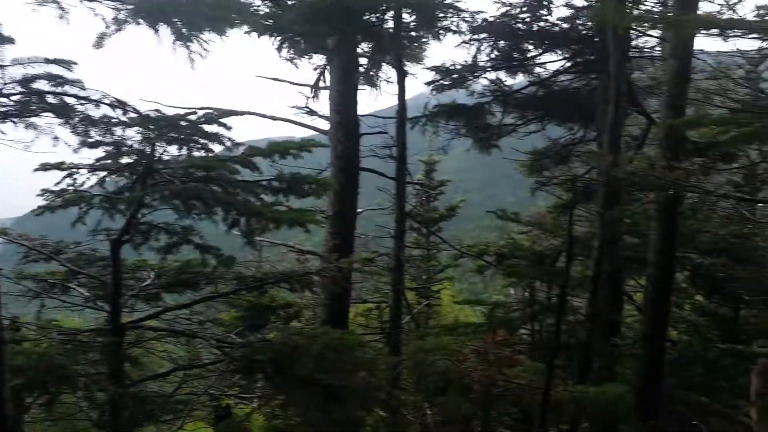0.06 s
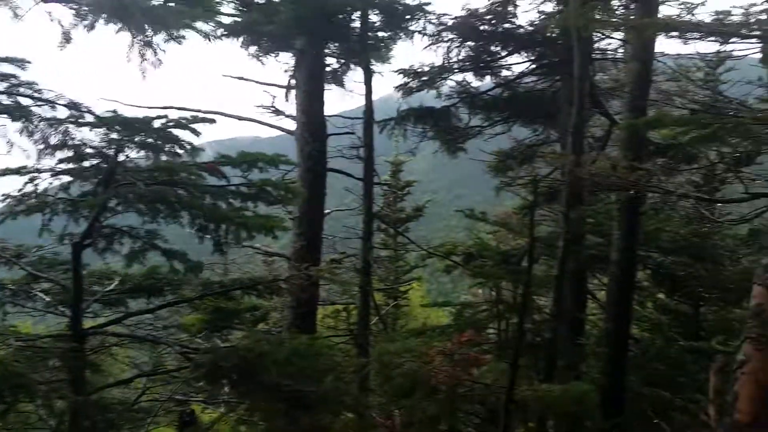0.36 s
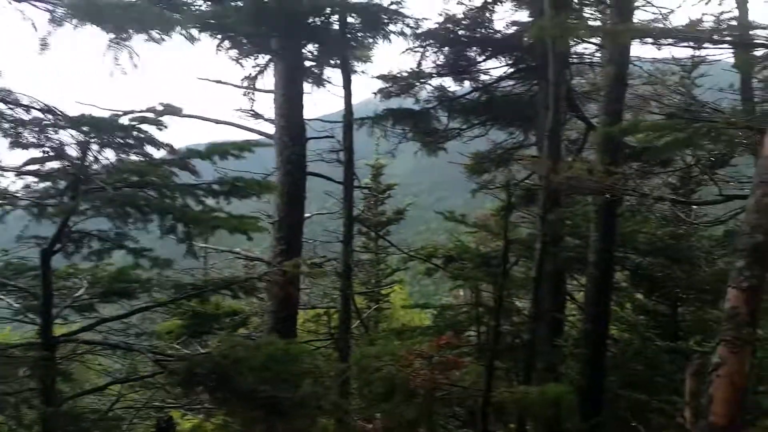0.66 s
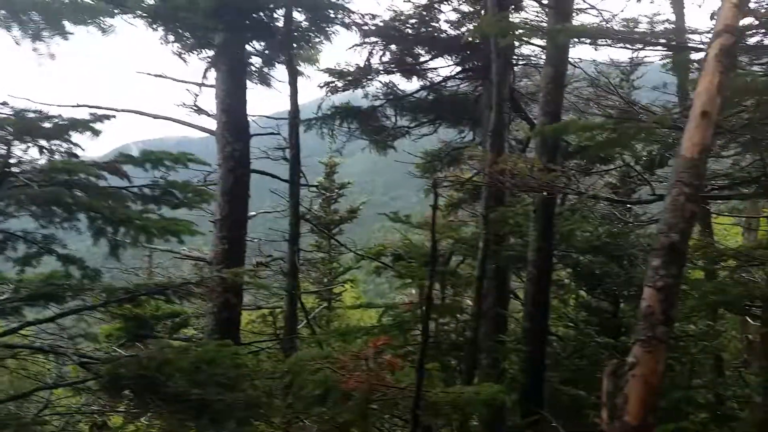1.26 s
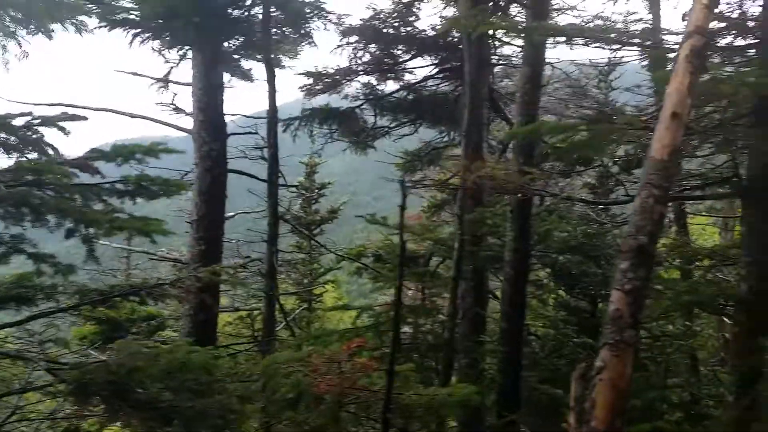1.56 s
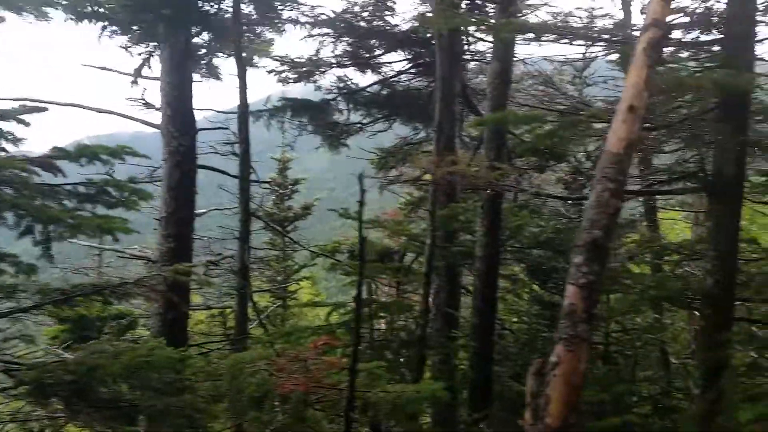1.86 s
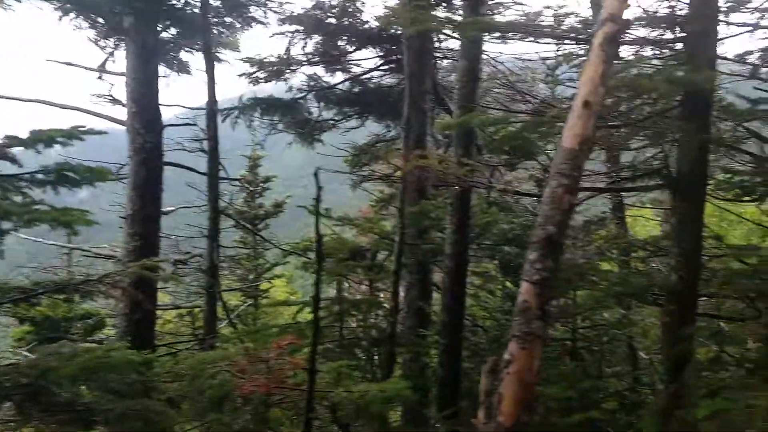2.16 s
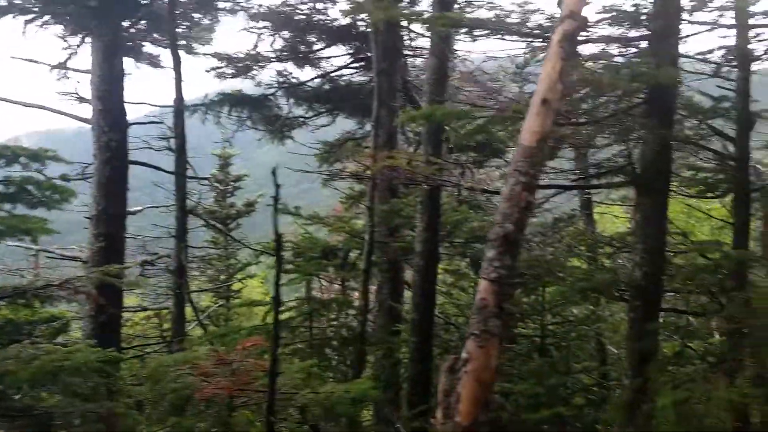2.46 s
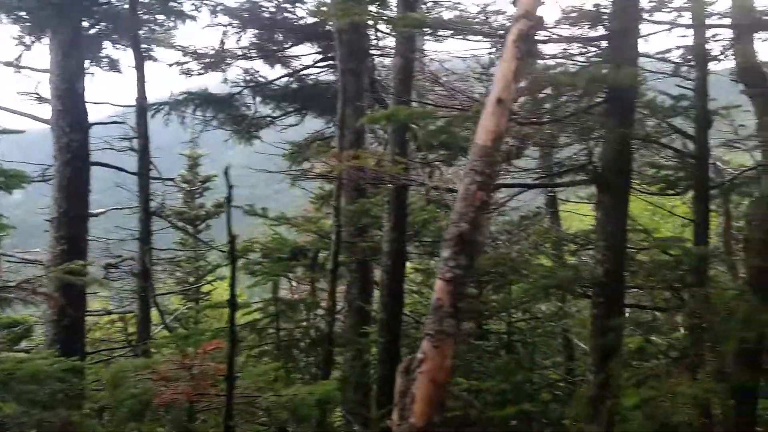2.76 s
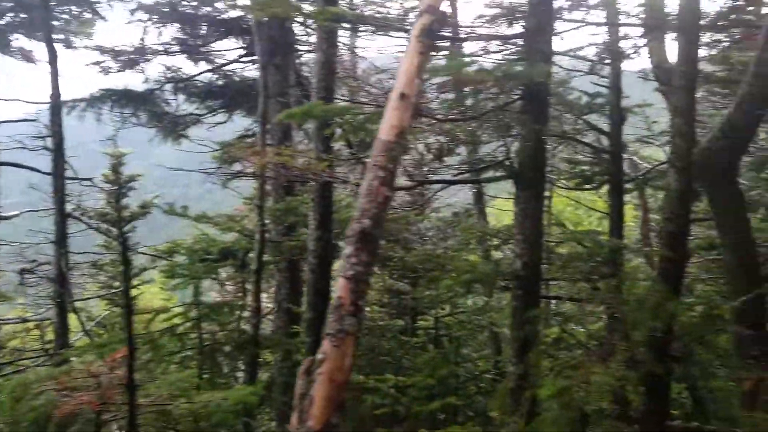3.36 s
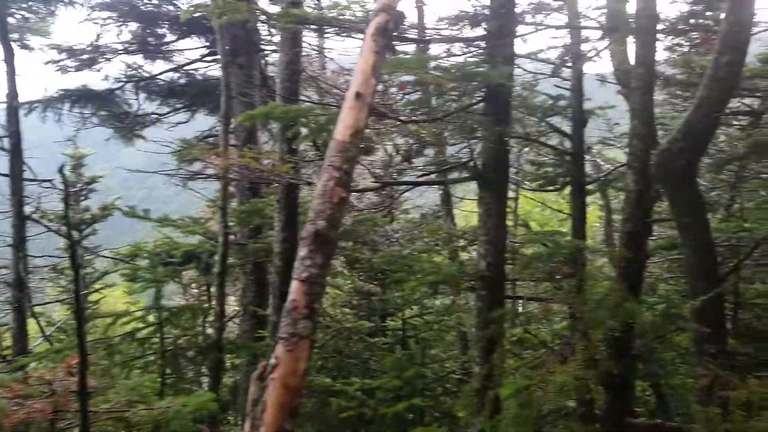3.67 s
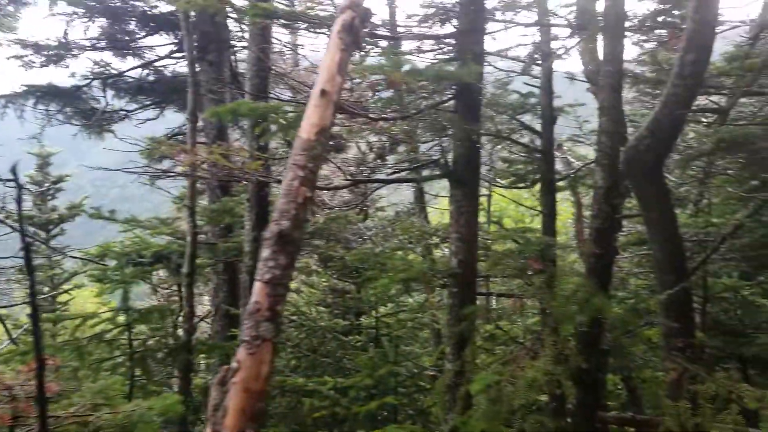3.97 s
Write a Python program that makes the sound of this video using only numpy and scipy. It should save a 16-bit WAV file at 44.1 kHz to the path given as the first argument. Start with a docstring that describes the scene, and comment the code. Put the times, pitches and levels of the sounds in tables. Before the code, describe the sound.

Wind rushes through conifers throughout, with a thin, high hiss in the needles. From the start, irregular puffs buffet the microphone left and right, making a low, fluttering rumble. Very faint dry twig ticks, mostly on the right, thicken to a light patter around 2 seconds. The hardest puff hits near 2.7 seconds. Buffeting continues until 4 seconds while the rush in the trees eases and dulls slightly.

```python
"""From the start, turbulent wind roars through conifers on a mountain slope and hisses in the needles.
The two ports of a hand-held microphone colour the rush: a dip near 7.5 kHz, a resonance near 10.5 kHz.
Almost at once, puffs of air buffet each port on its own; their eddies make a low, fluttering rumble.
Then dry twigs tick faintly, thickening to a patter near 2.1 s as a gust shakes the branches.
The hardest puff strikes near 2.7 s, while the wind in the trees slowly eases and dulls."""
import sys
import numpy as np
from scipy import signal
from scipy.fft import rfft, irfft
from scipy.io import wavfile
from scipy.ndimage import uniform_filter1d

SR = 44100
rng = np.random.default_rng(int(sys.argv[2]) if len(sys.argv) > 2 else 0)


def transcribe(signal):
    """Save signal, clipped to [-1, 1], as a 16-bit WAV file at the path in sys.argv[1]."""
    frames = np.atleast_2d(signal).T
    limited = np.clip(frames, -1, 1)
    pcm = np.round(limited * 32767).astype(np.int16)
    wavfile.write(sys.argv[1], SR, pcm)


N = 176400
T = np.arange(N) / SR
FREQS = np.arange(N // 2 + 1) * SR / N


def undb(db):
    """Amplitude ratio of a level: a factor of ten for every 20 dB."""
    return 10 ** (np.asarray(db) / 20)


def columns(table, at):
    """Linear interpolation of a table's columns over its first."""
    first, *rest = np.array(table, float).T
    return np.array([np.interp(at, first, col) for col in rest])


def colour(x, table):
    """Spectral shaping by rows of f/Hz, level/dB, normalised so that white noise keeps its power."""
    hz, *levels = np.array(table, float).T
    gain = undb([np.interp(np.log(FREQS + 1), np.log(hz), db) for db in levels])
    return irfft(rfft(x) * gain / np.sqrt(np.mean(gain ** 2)), N)


def waver(rate_hz):
    """Low-pass random modulation: steps drawn at rate_hz, smoothed, with unit standard deviation."""
    hold = max(int(SR / rate_hz), 1)
    steps = rng.standard_normal(N)[np.arange(N) // hold]
    smooth = uniform_filter1d(uniform_filter1d(steps, hold), hold)
    return smooth / smooth.std()


def diffuse_field(port_spacing_m=0.13, lag_s=.00005):
    """Sound from all sides is coherent at two spaced ports in the bass and unrelated in the treble."""
    left, independent = rfft(rng.standard_normal((2, N)))
    coherence = np.sinc(2 * FREQS * port_spacing_m / 343)
    right = coherence * left + np.sqrt(1 - coherence ** 2) * independent
    delay = np.exp(-2j * np.pi * FREQS * lag_s)
    return irfft(np.array([left, right * delay]), N)


# Envelope of the wind in the crowns: t/s, relative roar level/dB, relative hiss level/dB
WIND_ENVELOPE = [(0, -0.2, -0.2), (1.07, 0.53, -0.1), (1.7, -1, -1.9), (2.5, -2, -2.4), (2.85, -3.5, -4.5),
                 (3.3, -3, -6), (4, -3.7, -4)]
# Spectral shape of the roar: f/Hz, left level/dB, right level/dB
ROAR_SPECTRUM = [(30, -2, -2.5), (200, 0.5, 0.5), (370, 0.5, 2), (516, -1.5, -1), (790, 0.5, 1.5),
                 (1110, -2, 0), (1690, -5, -1.5), (2360, -8.5, -6.5), (2985, -13, -18),
                 (4000, -19.5, -28.5), (5020, -24.5, -33.5), (6360, -31, -40), (8000, -40, -49),
                 (16000, -63.5, -55)]
# Spectral shape of the needle hiss through the resonant ports: f/Hz, left level/dB, right level/dB
HISS_SPECTRUM = [(5000, -37, -37.5), (7500, -25.5, -29.5), (8490, -23, -19), (9480, -10, -9.5),
                 (10020, -5, -3), (10450, -8.5, 1.5), (11400, -13, -4), (12900, -15.5, -12.5),
                 (14300, -16.5, -16), (15800, -17, -16.5)]


def wind_in_conifers(roar_gain_db=-44.5, hiss_gain_db=-60, swell_db=0.18, flicker_db=0.6):
    """Turbulent flow past crowns and needles radiates broadband noise, which dulls as the wind eases."""
    roar_db, hiss_db = columns(WIND_ENVELOPE, T) + swell_db * waver(rate_hz=3.055)
    spectrum = rfft(colour(diffuse_field(), ROAR_SPECTRUM))
    octave = np.clip(np.log2((FREQS + 1) / 300), 0, 4)
    roar = 0
    for k in range(5):
        band = irfft(spectrum * np.maximum(1 - abs(octave - k), 0), N)
        band_db = hiss_db if k == 4 else roar_db  # the top band follows the hiss
        roar = roar + band * undb(band_db + flicker_db * waver(rate_hz=9))
    hiss = colour(rng.standard_normal((2, N)), HISS_SPECTRUM)
    return roar * undb(roar_gain_db) + hiss * undb(hiss_gain_db + hiss_db)


def eddies(spectrum, steady_s):
    """Turbulent pressure is local: independent noise at each port, its power levelled over steady_s."""
    pressure = colour(rng.standard_normal((2, N)), spectrum)
    local_power = uniform_filter1d(pressure ** 2, int(steady_s * SR), axis=1)
    return pressure / np.sqrt(local_power + 1e-9)


# Drive of the draught on the ports: t/s, left level/dB, right level/dB
PORT_DRAUGHT = [(0, -27, -28.5), (.35, -30, -34.5), (.7, -31, -30.5), (.92, -40, -39.5), (1.3, -42, -31.5),
                (1.7, -32, -31.5), (2.35, -37, -33), (2.72, -21, -25.5), (3.1, -30.5, -27),
                (3.4, -35.5, -29.5), (4, -35, -31)]
# Drive of the puffs: centre t/s, duration/s, level/dB, relative level for small eddies/dB, port
PORT_PUFFS = [(0.071, 0.035, -21, 12, "left"), (0.174, 0.017, -26.5, 9, "left"),
              (0.226, 0.015, -13, -9, "right"), (0.349, 0.0084, -16, -1.5, "left"),
              (0.549, 0.039, -24.5, -6, "right"), (0.605, 0.026, -19, -5, "left"),
              (0.714, 0.026, -15.5, -1, "right"), (0.778, 0.062, -23, 3.5, "right"),
              (0.985, 0.012, -23.5, -5, "right"), (1.237, 0.013, -20.5, -9, "right"),
              (1.411, 0.012, -17.5, -4, "right"), (1.484, 0.021, -17, -12, "right"),
              (1.573, 0.026, -21.5, -4.5, "left"), (1.618, 0.0093, -10.5, -7, "left"),
              (1.661, 0.032, -19.5, 2.5, "right"), (1.777, 0.061, -26, -6, "left"),
              (1.875, 0.041, -19.5, 9.5, "right"), (1.903, 0.021, -15.5, 1, "right"),
              (1.961, 0.085, -18.5, -3.5, "right"), (1.97, 0.079, -18, -2.5, "left"),
              (2.075, 0.01, -20.5, 2, "left"), (2.089, 0.026, -20, 5, "right"),
              (2.105, 0.015, -20.5, 2, "left"), (2.181, 0.073, -16.5, 3.5, "right"),
              (2.258, 0.019, -16.5, -2.5, "right"), (2.297, 0.013, -14, 1, "right"),
              (2.402, 0.042, -22.5, 6.5, "right"), (2.512, 0.033, -21.5, -8, "right"),
              (2.66, 0.015, -12.5, -5, "right"), (2.734, 0.023, -10, 1, "left"),
              (2.81, 0.048, -18.5, 4, "left"), (2.862, 0.023, -13.5, 2, "right"),
              (2.949, 0.029, -17.5, -4, "right"), (3.006, 0.028, -16, 3, "right"),
              (3.052, 0.024, -19, 7.5, "right"), (3.13, 0.086, -20.5, -3, "left"),
              (3.235, 0.037, -21, -5, "right"), (3.304, 0.02, -19.5, -1, "left"),
              (3.499, 0.027, -14, 2.5, "left"), (3.565, 0.053, -20.5, -5, "left"),
              (3.597, 0.057, -18.5, 0, "right"), (3.654, 0.035, -15, 2, "left")]
# Spectral shape of the large eddies: f/Hz, level/dB
LARGE_EDDY_SPECTRUM = [(8, -30), (25, -11), (50, 0.5), (82, 1.5), (140, -4), (190, -14.5), (270, -28.5),
                       (400, -43), (3000, -104)]
# Spectral shape of the small eddies: f/Hz, level/dB
SMALL_EDDY_SPECTRUM = [(60, -22), (150, 3), (240, 1), (350, -8), (480, -25), (800, -39.5), (3000, -76)]


def buffeting(reference_db=-14, large_db=1.5, small_db=-14.5, small_exponent=1.48, flutter_db=1.58):
    """Draught and puffs add in power to drive eddies; the small, brighter ones grow by a steeper law."""
    large_power = undb(columns(PORT_DRAUGHT, T)) ** 2
    small_power = large_power.copy()
    for at, duration, db, extra_db, port in PORT_PUFFS:
        puff = undb(db) ** 2 * np.exp(-(2 * (T - at) / duration) ** 2)
        channel = ["left", "right"].index(port)
        large_power[channel] += puff
        small_power[channel] += puff * undb(extra_db) ** 2
    flutter = undb(flutter_db * np.array([waver(rate_hz=45), waver(rate_hz=45)]))
    large_drive = np.sqrt(large_power) * flutter / undb(reference_db)
    small_drive = np.sqrt(small_power) * flutter / undb(reference_db)
    large = large_drive * eddies(LARGE_EDDY_SPECTRUM, steady_s=0.039)
    small = small_drive ** small_exponent * eddies(SMALL_EDDY_SPECTRUM, steady_s=0.027)
    return undb(reference_db) * (undb(large_db) * large + undb(small_db) * small)


def snap(hz, width_hz=1050, attack_s=.0005, decay_s=0.0024, size=2048):
    """A damped transient: noise in a Gaussian band around hz rises fast and decays exponentially."""
    freqs = np.arange(size // 2 + 1) * SR / size
    band = np.exp(-.5 * ((freqs - hz) / width_hz) ** 2)
    noise = irfft(rfft(rng.standard_normal((2, size))) * band)
    envelope = np.exp(-T[:size] / decay_s) * np.minimum(T[:size] / attack_s, 1)
    return noise / noise.std() * envelope


# Distinct ticks of dry twigs: t/s, relative level/dB, centre f/Hz
TWIG_TICKS = [(.785, -39.5, 11200), (1.547, -42, 11000), (1.788, -39, 11200), (1.870, -45, 12900),
              (1.905, -46, 12900), (2.498, -41, 12000), (2.515, -43, 12000), (2.663, -41, 11800),
              (3.231, -44, 11000), (3.857, -43, 10800), (3.917, -40, 11000)]


def twigs(patter_count=420, gain_db=-4, left_db=-11):
    """Superposed snaps, louder on the right: a few clear ones amid a patter that swells and dies away."""
    when, strength, pitch = rng.standard_normal((patter_count, 3)).T
    patter_s = (2.1 + .5 * when) % T[-1]
    patter_db = -59 + 3 * strength
    patter_hz = 11800 + 750 * pitch
    ticks = np.zeros((2, N))
    for at, db, hz in TWIG_TICKS + list(zip(patter_s, patter_db, patter_hz)):
        start = int(at * SR)
        tick = snap(hz)[:, :N - start]
        ticks[:, start:start + tick.shape[1]] += undb(db + gain_db) * tick
    return ticks * undb([[left_db], [0]])


def scene(fade_s=.006):
    """Superposition: the pressures of trees, twigs and buffeting add, the buffeting faded in and out."""
    from_edge_s = np.minimum(T, T[::-1])
    fade = np.sin(np.pi / 2 * np.minimum(from_edge_s / fade_s, 1)) ** 2
    return wind_in_conifers() + twigs() + fade * buffeting()


def record(dry, low_cut_hz=25, top_hz=15800):
    """Band limiting: a gentle high-pass thins the deepest bass and a steep low-pass cuts the top."""
    high_pass = signal.butter(1, low_cut_hz, "high", fs=SR, output="sos")
    low_pass = signal.ellip(10, .1, 80, top_hz, fs=SR, output="sos")
    return signal.sosfilt(low_pass, signal.sosfilt(high_pass, dry))


dry = scene()
out = record(dry)
transcribe(out)
```